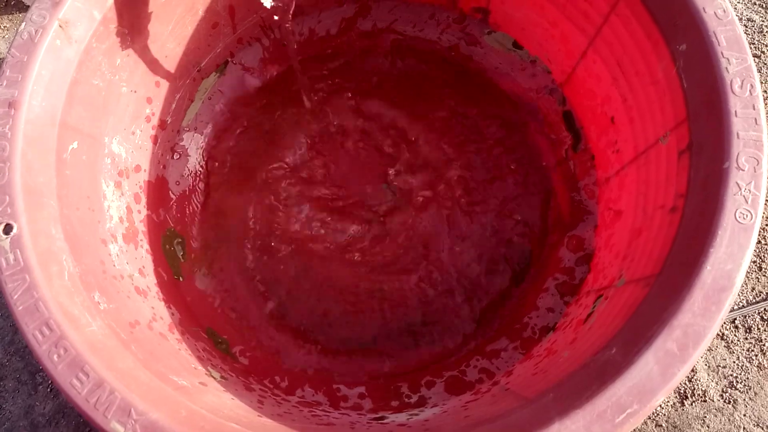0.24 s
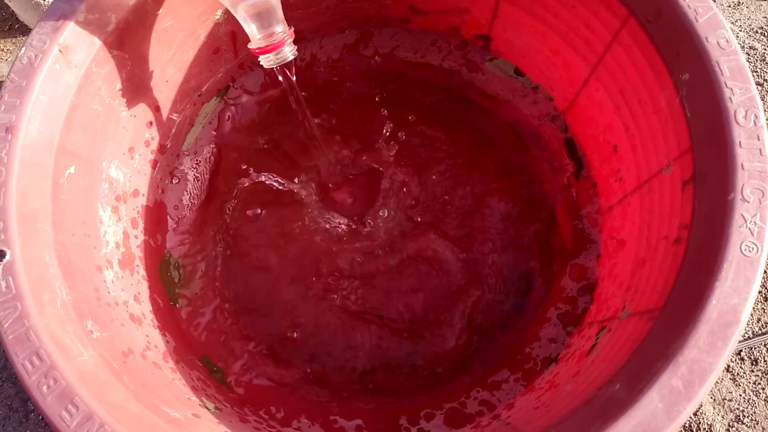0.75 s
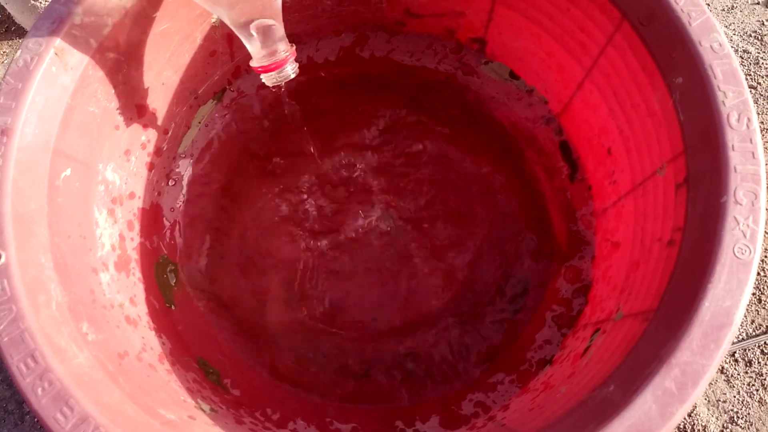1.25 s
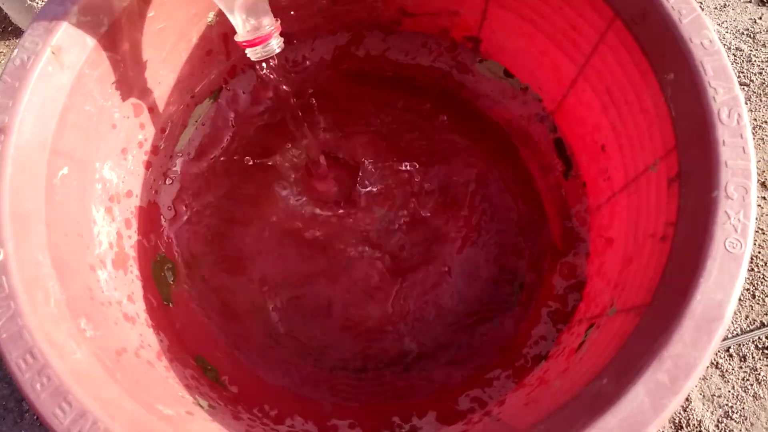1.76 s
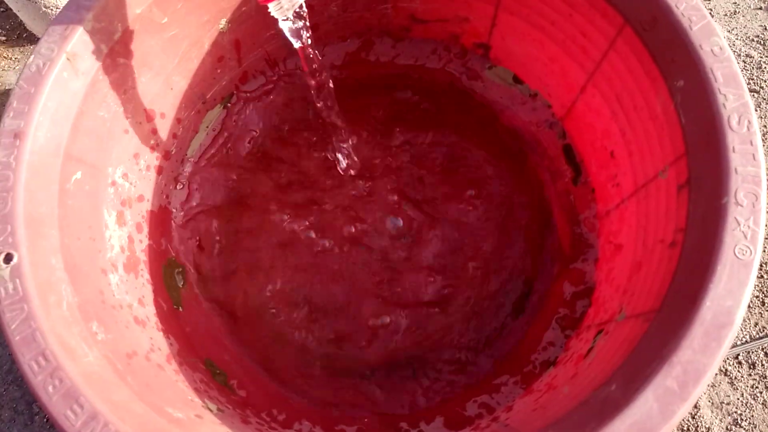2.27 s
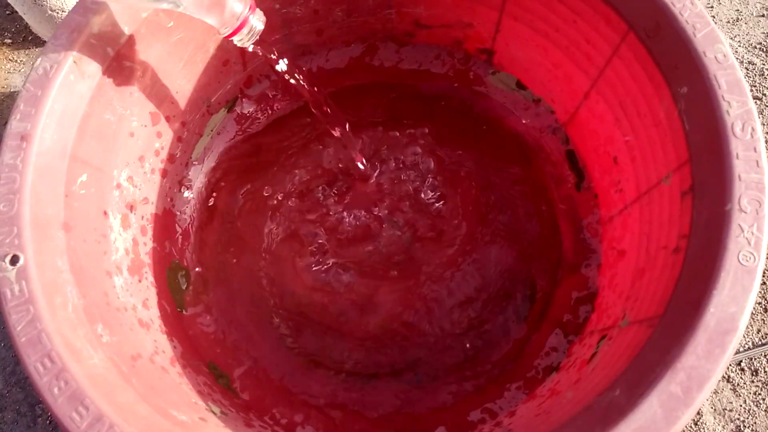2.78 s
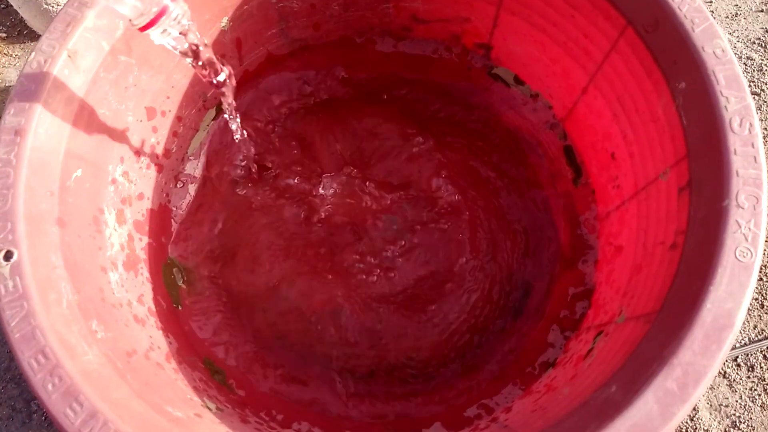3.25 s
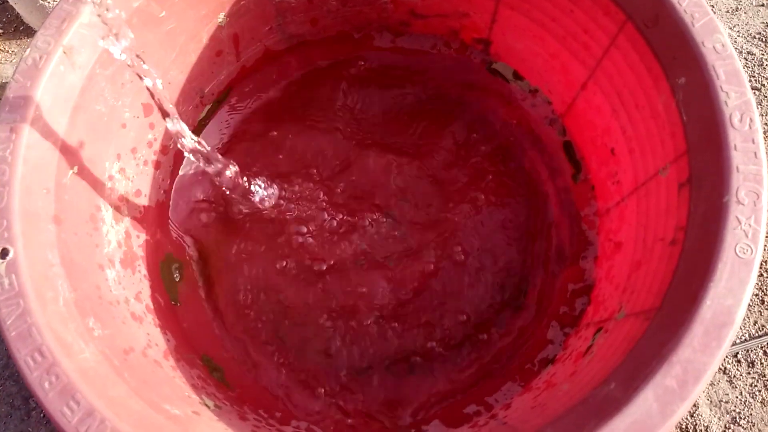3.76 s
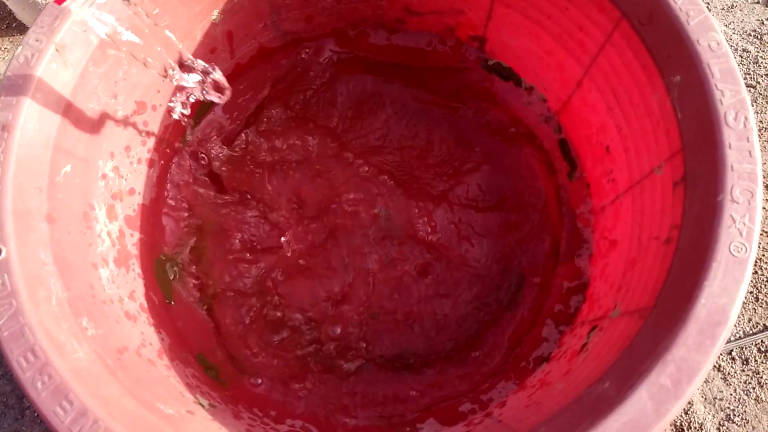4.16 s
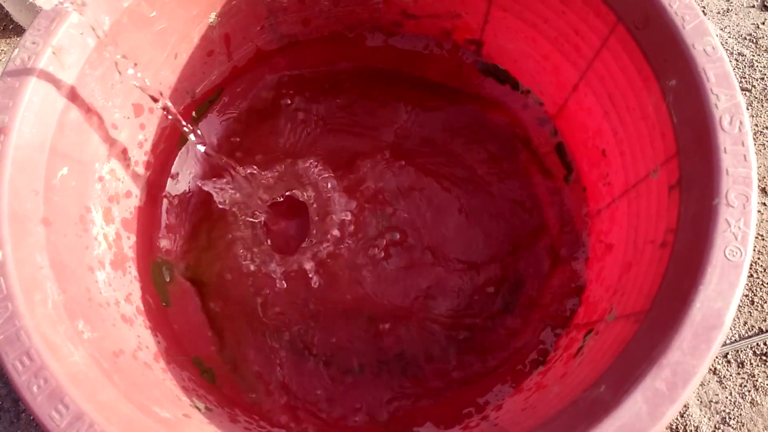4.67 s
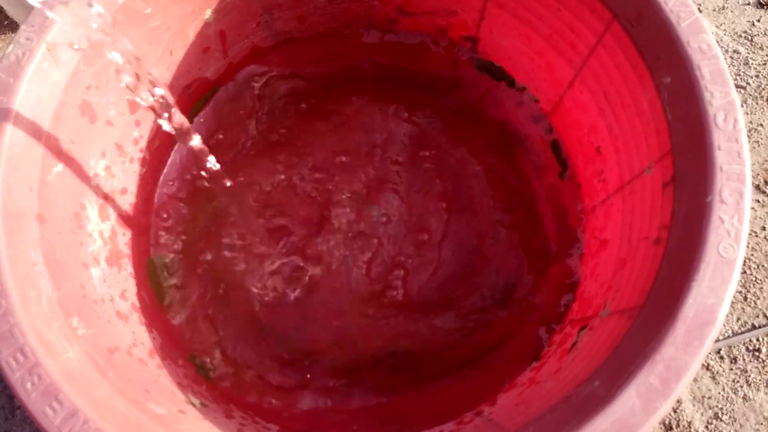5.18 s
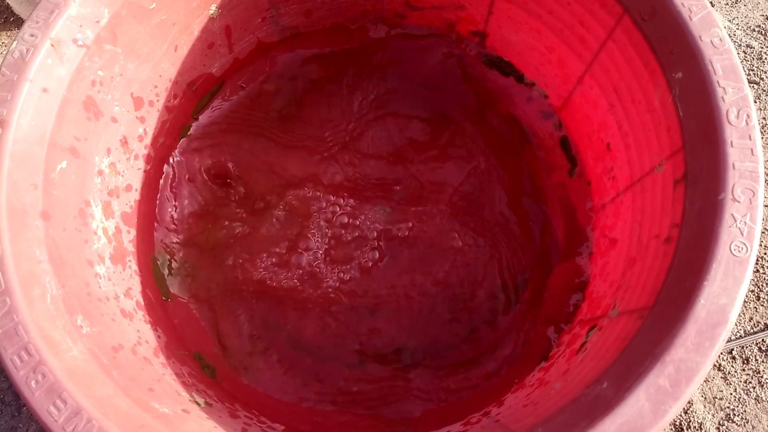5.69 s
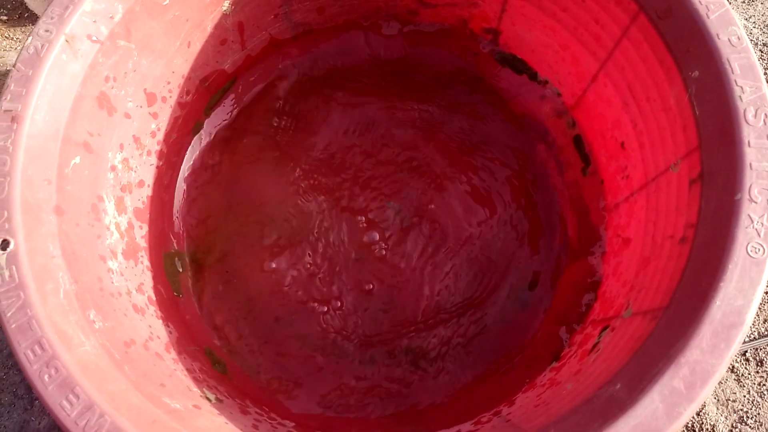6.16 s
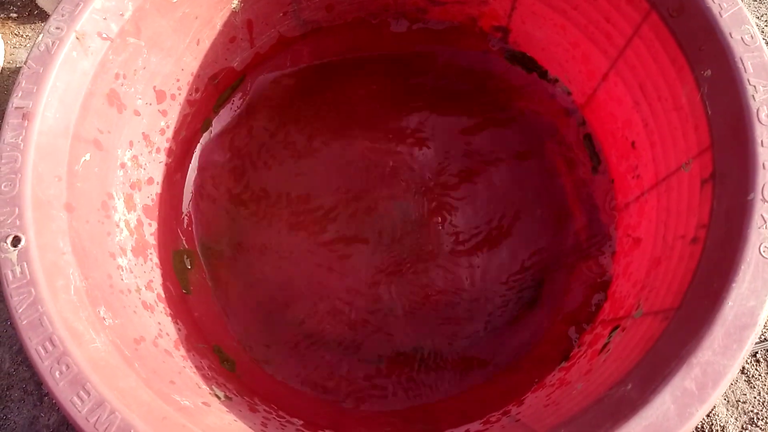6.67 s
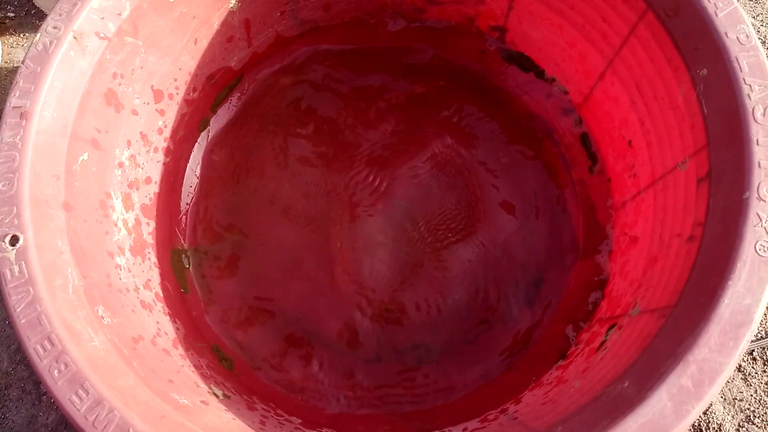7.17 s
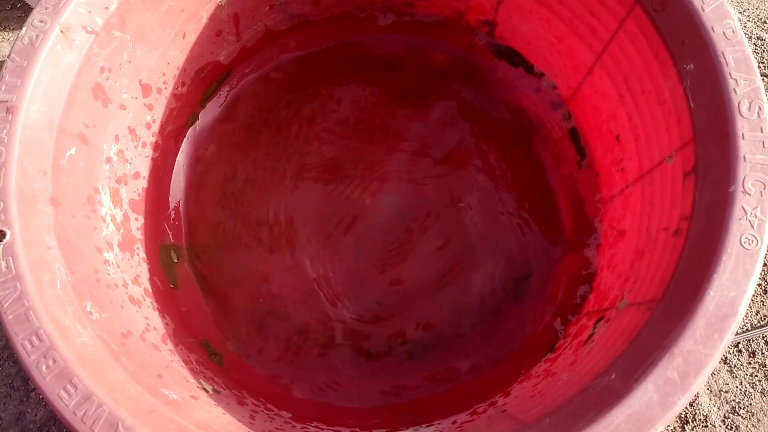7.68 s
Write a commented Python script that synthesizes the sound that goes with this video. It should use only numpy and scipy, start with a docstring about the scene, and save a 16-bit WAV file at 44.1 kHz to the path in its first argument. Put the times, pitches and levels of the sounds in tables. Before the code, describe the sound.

Water pours unevenly from a plastic bottle into a partly filled basin, splashing and gurgling, then drips as the bottle pops, over a low hum.

```python
"""Water pours from a plastic bottle into a partly filled plastic basin in a yard.
The uneven stream traps ringing bubbles and throws spray; the basin's walls echo the drops.
When the pour ends, froth crackles away and a few last drips fall. The thin bottle pops five times,
first with a double snap, last and loudest among those drips. A faint rustle and a far-off tone
pass near the end, and a low hum wavers behind it all over rumble and hiss."""
import sys
import numpy as np
from scipy import signal
from scipy.fft import rfft, irfft, next_fast_len
from scipy.io import wavfile
from scipy.ndimage import uniform_filter1d

SR = 44100
rng = np.random.default_rng(int(sys.argv[2]) if len(sys.argv) > 2 else 0)


def wav_out(sig):
    """Save sig, one row per channel (or a flat mono array), as 16-bit PCM at SR to the path in sys.argv[1]."""
    wavfile.write(sys.argv[1], SR, np.round(np.clip(np.atleast_2d(sig).T, -1, 1) * 32767).astype(np.int16))


N = 349536
TIME = np.arange(N) / SR
POUR_END_S = 5.62   # the last of the stream lands


# the unbroken stream, growing as the bottle is lifted: (time [s], gurgle [dB], splash [dB], spray [dB])
STEADY_FLOW = [(0, -62, -69, -66.5), (1.0, -61.5, -63, -67), (1.95, -62.5, -67, -69),
               (2.45, -56.5, -64.5, -63.5), (3.1, -70, -62.5, -67), (3.55, -54.5, -55, -55),
               (4.1, -81, -57.5, -54), (4.6, -84, -57.5, -56), (4.97, -66, -60, -60.5),
               (5.17, -64.5, -48, -59.5), (5.5, -59, -49, -55), (5.66, -66, -75, -71.5)]
# slugs of water plunging in: (time [s], fall time [s], splash [dB], gurgle [dB])
GUSHES = [(0.236, .06, -48, -49), (0.566, 0.028, -49, -41.5), (0.658, 0.045, -56.5, -46),
          (0.818, 0.044, -54, -47.5), (0.958, .03, -52, -44.5), (1.13, .08, -54, -49),
          (1.702, .025, -48.5, -55), (1.82, 0.05, -52, -49), (2.092, .08, -58.5, -73),
          (2.272, 0.028, -49, -46), (2.434, 0.036, -53.5, -50), (2.541, 0.037, -49.5, -64),
          (2.682, 0.056, -53, -44.5), (2.809, 0.087, -44.5, -50.5), (3.084, 0.037, -50, -53),
          (3.189, .04, -43, -46.5), (3.262, .03, -52.5, -54), (3.364, 0.046, -46, -64),
          (3.513, .04, -39.5, -45), (3.601, 0.054, -46.5, -53), (3.699, .06, -46.5, -55),
          (3.787, .04, -51, -54), (3.927, .04, -39, -51), (4.052, .025, -48, -67), (4.126, .07, -46, -53.5),
          (4.274, .06, -46.5, -60), (4.43, .06, -40, -44), (4.554, .03, -46, -89),
          (4.661, 0.028, -46.5, -51), (4.772, .028, -36.5, -40.5), (4.859, .03, -50.5, -48),
          (5.059, .07, -41, -48.5), (5.36, .05, -46, -72), (5.479, .05, -49.5, -50)]

def churning(rise_s=0.019, gush_spray_db=-7, wobble_db=2, wobble_hz=14):
    """Gurgle, splash and spray envelopes in dB: a wobbling flow plus gushes that swell and die away."""
    splash, gurgle = np.zeros((2, N))
    t = TIME[:SR // 2] - 0.1
    for s, fall_s, splash_db, gurgle_db in GUSHES:
        shape = np.exp(np.minimum(t / rise_s, -t / fall_s))
        add(splash, s + t[0], from_db(splash_db) * shape)
        add(gurgle, s + t[0], from_db(gurgle_db) * shape)
    spray = splash * from_db(gush_spray_db)
    flow = from_db(in_time(STEADY_FLOW) + wobble_db * drift(wobble_hz))
    return 20 * np.log10(np.hypot([gurgle, splash, spray], flow))


# spells in which the stream runs smooth and burbles: (start [s], length [s], level [dB])
BURBLES = [(1.11, 0.5, -52.5), (5.21, 0.37, -55.5)]

def stream(gurgle_db, splash_db, spray_db):
    """The stream plunges in with a dull push, churns up bubbles and rings the basin's lowest note."""
    large = bubble_cloud(475, 1229, per_s=170, cycles=20.3, spread_db=5, size=1600)
    medium = bubble_cloud(1153, 3690, per_s=520, cycles=29, spread_db=4, size=900, rise=0.089)
    small = bubble_cloud(3680, 11390, per_s=250, cycles=64, spread_db=7, size=800, rise=0.14)
    burble = bubble_cloud(1310, 2240, per_s=600, cycles=38, spread_db=1.5, size=1300)
    hollow = band(resonate(rng.standard_normal(N), hz=350, width=55), 260, 515)
    plunge = band(rng.standard_normal(N), 155, 203)
    water = from_db(gurgle_db - 4) * even(large, size=2600)
    water += from_db(splash_db - 4) * even(medium, size=2400)
    water += from_db(spray_db - 4.5) * even(small, size=3200)
    water += spells(BURBLES, edge_s=0.06) * burble
    water += from_db((2 * gurgle_db + splash_db) / 3 - 3) * even(hollow, size=4000)
    water += from_db(gurgle_db - 10) * even(plunge, size=4000)
    return pour_gate() * water


# tone colour of the bubble clouds and droplet patter: (frequency [Hz], gain [dB])
SPLASH_COLOUR = [(540, 0.5), (720, -3), (1100, 1), (2000, 6.5), (2600, 6.5), (3300, -10.5), (4000, 0),
                 (5000, -5), (6200, -1.5), (7200, -10), (8500, -1.5), (10000, 0), (11500, -2.5),
                 (13500, -9.5), (15500, -2.5)]

def bubble_cloud(low_hz, high_hz, per_s, cycles, spread_db, size, rise=0.27):
    """Countless bubbles at unit RMS, each climbing in pitch and dying 60 dB in about `cycles` cycles."""
    when, chance, pitch, glide = rng.random((6000, 4))[:int(per_s * N / SR)].T[..., None]
    hz = low_hz * (high_hz / low_hz) ** pitch
    age = TIME[:size] * hz / cycles   # in units of each bubble's ring time
    strength = unequal(chance, spread_db) * from_db(at_hz(SPLASH_COLOUR, hz)) * hz
    notes = strength * chirp(age, cycles, rise * glide) * impact(age, swell=0.095, t60=1)
    samples = (when * N).astype(int) + np.arange(size)
    cloud = np.bincount(samples.ravel(), notes.ravel(), N)[:N]
    return rms_one(basin_echo(cloud, wall=0.28, tail_db=-7.5, tail_t60=0.09))


def patter(low_hz, high_hz, per_s, spread_db, tick_s, bands, density=1, width_octaves=0.27):
    """Tiny droplets at unit RMS, each a noise tick around its own pitch with a short wall echo."""
    when, chance, pitch, keep = rng.random((12000, 4))[:int(per_s * N / SR)].T
    at = (when * (N - 1)).astype(int)
    strength = unequal(chance, spread_db) * (keep < (density * np.ones(N))[at])
    edges = np.geomspace(low_hz, high_hz, bands + 1)
    out = np.zeros(N)
    for low, high in zip(edges, edges[1:]):
        hz = np.sqrt(low * high)
        octaves_off = np.log2(hz / low_hz) - pitch * np.log2(high_hz / low_hz)
        hits = np.bincount(at, strength ** 2 * np.exp(-(octaves_off / width_octaves) ** 2), N) + 1e-18
        power = smear(smear(hits, tick_s / 2), tick_s)
        echo = 0.18 * smear(power, fall_s=0.004)
        noise = band(rng.standard_normal(N), low, high)
        out += from_db(at_hz(SPLASH_COLOUR, hz)) * np.sqrt(power + echo) * noise
    return rms_one(out)


def splatter(splash_db, spray_db, densest_db=-52, thinning=0.62):
    """The stream breaks into droplets: coarse ones follow the splash, fine ones and mist the spray."""
    density = from_db(thinning * (spray_db - densest_db))   # weaker flow throws fewer droplets
    coarse = patter(1334, 6200, per_s=900, spread_db=3, tick_s=0.0014, bands=8, density=density)
    fine = patter(3710, 12560, per_s=1200, spread_db=4.5, tick_s=0.0012, bands=8, density=density)
    mist = patter(14300, 16300, per_s=1100, spread_db=3, tick_s=0.0015, bands=1, density=density)
    layers = (splash_db - 5.5, coarse), (spray_db - 5, fine), (spray_db - 8, mist)
    return pour_gate() * sum(from_db(db) * even(droplets, size=3000) for db, droplets in layers)


# the largest single bubbles: (time [s], level [dB], pitch [Hz], t60 [s])
BIG_BUBBLES = [(0.037, -55, 1060, 0.017), (0.0928, -49, 1910, 0.021), (0.1351, -39, 1350, 0.012),
               (0.2122, -41.5, 1890, 0.044), (0.217, -48, 1090, 0.025), (0.2434, -41.5, 2610, 0.037),
               (0.2721, -51, 2300.0, 0.008), (0.3132, -46.5, 1380, 0.029), (0.4038, -46.5, 1100, 0.038),
               (0.5605, -43, 910, 0.035), (0.6453, -51, 1140, 0.036), (0.6648, -43, 950, 0.053),
               (0.7054, -49.5, 2680, 0.007), (0.7998, -44.5, 2170, 0.015), (0.8398, -51, 2040, 0.027),
               (0.8959, -39, 362, 0.041), (0.9464, -46, 1640, 0.044), (0.947, -49, 850, 0.035),
               (1.076, -52, 1100, 0.029), (1.256, -50.5, 990, 0.025), (1.362, -51.5, 980, 0.038),
               (1.116, -45, 1090, 0.042), (1.1477, -45, 2020, 0.008), (1.3505, -41.5, 350, 0.07),
               (1.4106, -45, 1810, 0.023), (1.4641, -47, 2070, 0.02), (1.5045, -47.5, 2050, 0.029),
               (1.7089, -41.5, 4060, 0.0039), (1.8211, -51, 1090, 0.031), (1.8686, -50.5, 1790, 0.029),
               (1.9005, -50, 2820, 0.016), (2.0241, -38, 1912, 0.033), (2.0388, -40.5, 2130, 0.015),
               (2.1151, -51, 1160, 0.04), (2.125, -50, 1970, 0.02), (2.2613, -35.5, 1290, 0.0064),
               (2.2712, -40.5, 960, 0.022), (2.272, -43.5, 2680, 0.012), (2.3238, -46, 2640, 0.011),
               (2.4256, -38.5, 1270, 0.0082), (2.4507, -47.5, 1340, 0.052), (2.6276, -37.5, 3040, 0.0075),
               (2.6414, -40.5, 1580, 0.013), (2.6793, -38, 2165, 0.027), (2.734, -41, 2020, 0.026),
               (2.7983, -42, 1920, 0.0083), (2.822, -46, 820, 0.022), (2.8355, -44, 2180, 0.011),
               (2.8699, -48, 1375, 0.044), (2.932, -51.5, 980, 0.052), (3.079, -43, 478, 0.048),
               (3.093, -42.5, 2040, 0.032), (3.181, -36, 1920, 0.0049), (3.1979, -35.5, 2100, 0.0044),
               (3.2606, -42.5, 576, 0.052), (3.3064, -45.5, 2070, 0.027), (3.3505, -41.5, 2070, 0.054),
               (3.361, -40, 2030, 0.029), (3.3698, -39, 529, 0.13), (3.3901, -34, 818, 0.059),
               (3.4861, -39.5, 1940, 0.042), (3.512, -40, 2630, 0.012), (3.5173, -39, 2310, 0.037),
               (3.5455, -46, 1720, 0.02), (3.5864, -36.5, 2230, 0.022), (3.592, -47.5, 655, 0.035),
               (3.6074, -41, 2810, 0.038), (3.6819, -41, 2110.0, 0.058), (3.7296, -47, 2590, 0.011),
               (3.7648, -49, 2520.0, 0.033), (3.797, -47.5, 500, 0.037), (3.856, -42.5, 1700, 0.023),
               (3.878, -41.5, 3840, 0.014), (3.8916, -43.5, 1470, 0.019), (3.924, -47, 2700, 0.05),
               (3.9394, -52, 2180, 0.038), (4.045, -46, 2530, 0.087), (4.0916, -46, 2670, 0.0099),
               (4.1244, -47, 1670, 0.026), (4.1412, -47, 1430, 0.02), (4.1646, -42.5, 2250, 0.021),
               (4.2345, -40.5, 1034, 0.024), (4.277, -39.5, 2780, 0.017), (4.3085, -38, 1930, 0.016),
               (4.326, -39.5, 2500, 0.016), (4.3952, -43, 2740, 0.043), (4.405, -41, 2150, 0.016),
               (4.4271, -40.5, 1400, 0.025), (4.4458, -38.5, 1180, 0.025), (4.459, -45, 400, 0.05),
               (4.4994, -43.5, 2560, 0.094), (4.6426, -41.5, 2490, 0.043), (4.6614, -38, 1950, 0.015),
               (4.7189, -30.5, 2220, 0.015), (4.7557, -35, 1320, 0.0094), (4.7562, -40, 386, 0.05),
               (4.809, -49, 674, 0.03), (4.8514, -38, 1950, 0.014), (4.863, -50, 1190, 0.025),
               (4.9303, -44, 1466, 0.036), (4.9619, -44, 1440, 0.057), (5.0367, -39, 1184, 0.043),
               (5.0613, -37.5, 2750, 0.025), (5.1118, -43, 2600, 0.046), (5.1734, -47.5, 2770, 0.05),
               (5.191, -48, 2680, 0.018), (5.2843, -44, 1390, 0.013), (5.2955, -48, 1070, 0.11),
               (5.4421, -35, 2590, 0.039), (5.4586, -40, 2660, 0.017), (5.6008, -44.5, 3840, 0.013),
               (5.711, -43, 1110, 0.0098), (6.3587, -43, 2370, 0.03), (6.362, -45.5, 430, 0.041)]

def bubbles(splash_db, rise_per_s=12, swell_s=0.0014, slap_db=-6, trim_db=-0.5):
    """A slap pinches off a bubble, whose note rises as it nears the surface; lesser ones come by chance."""
    out, t = np.zeros(N), TIME[:SR // 8]
    lesser = scatter(splash_db, level_db=-51.5, follows=0.51, spread_db=1.5,
                     low_hz=900, high_hz=2950, crowding=0.5, count=50)
    # bigger, lower bubbles ring longer
    lesser = [(s, db, hz, 0.035 * (hz / 1000) ** -0.3) for s, db, hz in lesser]
    for s, db, hz, t60 in [*BIG_BUBBLES, *lesser]:
        glide = 1 + rise_per_s * rng.random() * (t - 2 * swell_s)
        note = np.sin(2 * np.pi * np.cumsum(hz * glide) / SR)
        slap = even(band(rng.standard_normal(len(t)), hz * 0.63, hz * 1.49), size=200)
        plop = (rms_one(note) + from_db(slap_db) * slap) * impact(t, swell_s, t60)
        echoed = basin_echo(plop, wall=0.38, tail_db=-9.5, tail_t60=0.093)
        add(out, s, from_db(db + trim_db) * attack_one(echoed))
    return out


# the sharpest drops slapping the water: (time [s], level [dB], pitch [Hz], t60 [s], fizz level [dB])
SHARP_DROPS = [(0.0917, -45, 9330, 0.021, -71.0), (0.106, -59, 6000, 0.012, -70),
               (0.1357, -39.5, 6170, 0.023, -50), (0.1895, -48, 6300, 0.01, -75.0),
               (0.211, -48, 6500, 0.009, -66.0), (0.24, -48.5, 8000, 0.01, -56.0),
               (0.254, -52, 9000, 0.014, -62), (0.3653, -48.5, 4990, 0.052, -54),
               (0.431, -57, 4800, 0.011, -70), (0.651, -44, 6130, 0.015, -52),
               (0.6615, -52, 7130.0, 0.025, -57.0), (0.705, -40, 6170, 0.02, -29),
               (0.8, -50.5, 7100, 0.015, -56), (0.9463, -36, 7900, 0.018, -61),
               (1.108, -50, 5970, 0.036, -69.0), (1.1321, -47.0, 8400, 0.032, -53),
               (1.2673, -53.5, 6100, 0.0082, -64), (1.3512, -46, 9660, 0.035, -60),
               (1.451, -56, 10700, 0.015, -59), (1.564, -52, 8500, 0.04, -62),
               (1.687, -43, 6900, 0.0084, -67), (1.7071, -33.5, 10250, 0.018, -62),
               (1.803, -51.5, 7400, 0.041, -54), (1.863, -54, 9500, 0.014, -64),
               (1.9748, -38, 6300, 0.014, -44), (2.0244, -41, 3830.0, 0.023, -32),
               (2.119, -50, 9100, 0.025, -60), (2.1936, -45.5, 10700, 0.025, -64),
               (2.2556, -40, 6770, 0.043, -62.0), (2.2983, -52, 6930.0, 0.004, -65.0),
               (2.3246, -40.5, 5890, 0.012, -54), (2.365, -58, 5950, 0.012, -70),
               (2.409, -48, 5870, 0.026, -47), (2.423, -50, 9800.0, 0.025, -55),
               (2.526, -46, 6270, 0.015, -60), (2.5508, -50, 3920.0, 0.025, -61.0),
               (2.599, -49, 10400, 0.012, -60), (2.6285, -49, 3420, 0.049, -52),
               (2.642, -45, 6100, 0.023, -62.0), (2.6752, -44, 5870, 0.023, -43),
               (2.7856, -44.5, 7540, 0.044, -52.0), (2.797, -45, 5400, 0.016, -58),
               (2.843, -45.0, 9860, 0.013, -66.0), (2.871, -41.5, 3920, 0.017, -56),
               (2.9319, -48, 8440, 0.032, -65.0), (3.1638, -52, 7900, 0.029, -63.0),
               (3.1895, -42, 4830, 0.01, -64), (3.2735, -42, 9800, 0.022, -51),
               (3.278, -45.5, 3660, 0.017, -62), (3.2915, -52, 6300, 0.018, -51),
               (3.332, -49, 5760, 0.009, -65.0), (3.345, -43.0, 9830, 0.039, -56.0),
               (3.3604, -39.5, 5850, 0.013, -50.0), (3.4548, -32.5, 5150, 0.0071, -60),
               (3.4677, -38, 6800, 0.013, -48), (3.604, -36, 9600, 0.0069, -53),
               (3.6534, -46, 5760, 0.025, -65.0), (3.6978, -39.5, 4770, 0.022, -60.0),
               (3.73, -45.5, 8500, 0.01, -56), (3.8188, -43.5, 7750, 0.11, -51.0),
               (3.925, -44, 7460, 0.034, -50.0), (4.0191, -47, 10100, 0.014, -50),
               (4.044, -40.5, 4100, 0.04, -43), (4.0567, -45, 8460.0, 0.013, -58.0),
               (4.0883, -48, 5000, 0.025, -58.0), (4.113, -42, 6590.0, 0.018, -60.0),
               (4.1244, -45, 5930, 0.025, -56.0), (4.1402, -42, 6000, 0.006, -56.0),
               (4.2, -49, 9800, 0.011, -56), (4.209, -54, 10500, 0.012, -56),
               (4.308, -44, 4280, 0.016, -58), (4.402, -43, 7500, 0.075, -58),
               (4.421, -44, 4930, 0.025, -56), (4.446, -46, 5300, 0.006, -62),
               (4.4828, -45, 5900, 0.009, -38), (4.4982, -44.5, 5920, 0.049, -53.0),
               (4.5426, -42, 7600, 0.0083, -51.0), (4.5744, -45.5, 5900, 0.021, -46),
               (4.603, -49, 7000, 0.016, -65.0), (4.642, -36.5, 8370, 0.029, -52),
               (4.66, -44, 7600, 0.022, -61), (4.7006, -43, 9540.0, 0.006, -62.0),
               (4.7168, -41.5, 3300, 0.053, -37), (4.852, -48, 6350, 0.014, -66),
               (4.8693, -43, 6380, 0.011, -45), (4.895, -40, 5640, 0.0064, -60.0),
               (4.931, -46.5, 5230, 0.0087, -57.0), (4.9868, -45.5, 9600, 0.0073, -57),
               (5.033, -46, 9400, 0.04, -52), (5.049, -46, 8100, 0.014, -58),
               (5.061, -45, 9700, 0.014, -58), (5.1612, -47.5, 9950.0, 0.013, -65.0),
               (5.188, -48, 9350.0, 0.013, -59.0), (5.367, -49.5, 4900, 0.012, -62),
               (5.405, -40, 6200, 0.024, -55.0), (5.5017, -48, 6030, 0.019, -53.5),
               (5.6014, -60, 4040, 0.015, -75.0), (5.711, -46, 3300, 0.0041, -58),
               (6.1998, -63, 10050, 0.0051, -79.0), (6.3592, -48.5, 5160, 0.021, -47),
               (6.5985, -56, 9800, 0.022, -77), (6.939, -51, 9800, 0.022, -59),
               (7.013, -56.5, 6640, 0.016, -60), (7.066, -57, 9600, 0.024, -68),
               (7.331, -58, 6300, 0.018, -79), (7.3452, -55, 7040, 0.025, -69.0)]

def drops(spray_db, swell_s=0.0013, ping_db=3, rise_per_s=16, fizz_lead_s=0.002, fizz_trim_db=-5):
    """Fine spray fizzes just ahead of each drop; a crack swells as it sinks in and a tiny bubble chirps."""
    out, t = np.zeros(N), TIME[:SR // 16]
    lesser = scatter(spray_db, level_db=-60.5, follows=1, spread_db=5.5,
                     low_hz=3770, high_hz=11160, crowding=0.31, count=90)
    lesser = [(s, db, hz, 0.0086, db - 8) for s, db, hz in lesser]   # short ticks with softer fizz
    for s, db, hz, t60, fizz_db in SHARP_DROPS + lesser:
        white = rng.standard_normal(len(t))
        ping = from_db(ping_db) * chirp(t, hz, rise_per_s * rng.random()) * impact(t, swell_s, 0.84 * t60)
        crack = even(band(white, hz * 0.62, hz * 1.8), size=150) * impact(t, swell_s, t60)
        fizz = even(band(white, 14500, 16200), size=150) * impact(t, swell=0.0025, t60=t60)
        for part, part_s, part_db in (ping + crack, s, db), (fizz, s - fizz_lead_s, fizz_db + fizz_trim_db):
            echoed = basin_echo(part, wall=0.2, tail_db=-10, tail_t60=0.052, spread_s=0.0043)
            add(out, part_s, from_db(part_db) * attack_one(echoed))
    return out


def froth(start_db=-64, fade_db_per_s=26.5, floor_db=-86):
    """The foam left by the pour bursts in a fine, uneven, fading crackle."""
    since_end = TIME - POUR_END_S
    fade = from_db(start_db - fade_db_per_s * np.abs(since_end)) + from_db(floor_db)
    flicker = from_db(drift(rate_hz=3))
    crackle = patter(5500, 15500, per_s=370, spread_db=4.5, tick_s=0.00076, bands=7)
    return (since_end > 0) * fade * flicker * crackle


def basin_echo(x, wall, tail_db, tail_t60, spread_s=0.007, echoes=5):
    """A few quick wall echoes, different for each spot on the water, then a short diffuse tail."""
    t = TIME[:SR // 10]
    tail = rng.standard_normal(len(t)) * decay(t, tail_t60) * (t > 0.002)
    response = from_db(tail_db) * tail / np.linalg.norm(tail)
    path = rng.uniform(0.12, 1, echoes)
    reflections = wall * (1 - path / 2) * rng.choice([-1, 1], echoes)
    np.add.at(response, (path * spread_s * SR).astype(int), reflections)
    response[0] = 1   # the direct sound
    return signal.fftconvolve(x, response)[:len(x)]


# the basin's high notes: (frequency [Hz], width [Hz], share added [ratio])
BASIN_NOTES = [(4780, 140, 0.41), (6090, 150, 0.55), (7550, 270, 0.23), (9850, 600, 0.32)]

def basin_ring(water):
    """The basin resonates and colours all the splashing."""
    return resonant_eq(water, BASIN_NOTES)


# snaps of the bottle's wall: (time [s], ring pitch [Hz], ring [dB], thump [dB], body [dB], clack [dB],
# snap [dB], fizz [dB], yard echo send [dB])
BOTTLE_POPS = [(2.7108, 837, -30.5, -35.5, -31.5, -60, -73, -74, -24.5),
               (2.7155, 780, -36, -39.5, -29, -60, -70, -72, -30),
               (3.046, 532, -28.5, -32.5, -23.5, -23.5, -42.5, -55, -62),
               (5.5276, 822, -27, -27.5, -27.5, -27.5, -40, -50, -39),
               (6.078, 604, -24, -38, -26, -39.5, -78, -59, -26.5),
               (6.7894, 2770, -20.5, -22, -19.5, -12, -18.5, -27, -17.5)]
# a pop's five bands, thump to fizz: (low edge [Hz], high edge [Hz], bottle t60 [s], yard t60 [s])
POP_BANDS = [(115, 221, 0.099, 0.75), (464, 1360, 0.066, 0.64), (1390, 2980, 0.049, 0.48),
             (3355, 6270, 0.044, 0.45), (6530, 12400, 0.034, 0.52)]
# modes that a hard pop leaves booming: (frequency [Hz], relative level [dB], t60 [s])
BOOM_MODES = [(117.5, -5, 1), (180, -15, 0.84), (216, -2.5, 0.42), (350, -7.5, 0.38), (455, -14.5, 0.58),
              (733, -0.5, 0.34), (1090, -3.5, 0.24), (1310, -4.5, 0.35), (1706, -9.5, 0.52),
              (2400, -7, 0.3)]

def bottle_pops(buckle_s=0.0028, ring_t60=0.042, boom_db=12):
    """A dent runs across the wall for a few milliseconds; the wall rings briefly and the yard answers."""
    out, t = np.zeros(N), TIME[:SR]
    after_buckle = np.maximum(t - buckle_s, 0)
    for s, hz, ring_db, *band_db, echo_db in BOTTLE_POPS:
        ring = np.sin(2 * np.pi * hz * t) * decay(after_buckle, ring_t60)
        pop = from_db(ring_db) * attack_one(ring)
        for db, (low, high, t60, yard_t60) in zip(band_db, POP_BANDS):
            window = int(3 * SR / (high - low))
            noises = rng.standard_normal((2, SR + SR // 10))
            near, far = [even(band(white, low, high, order=3), window)[-SR:] for white in noises]
            attack = 1 - np.exp(-t * high)
            yard = from_db(echo_db) * far * decay(t, yard_t60)
            pop += from_db(db) * attack * (near * decay(after_buckle, t60) + yard)
        drive_db = band_db[0] + echo_db + boom_db   # the thump sets the modes booming
        for mode_hz, db, t60 in BOOM_MODES:
            pop += from_db(drive_db + db) * np.sin(2 * np.pi * mode_hz * t) * decay(t, t60)
        add(out, s, pop)
    return out


def rustle(start_s=6.37, length_s=0.29, level_db=-69):
    """A faint soft rustle follows one of the last drips."""
    fade = np.interp(TIME - start_s, [-0.01, 0, length_s / 2, length_s], [0, 1, 0.7, 0])
    return from_db(level_db) * fade * rms_one(band(rng.standard_normal(N), 3800, 5500, order=4))


# contour of a faint far-off tone: (time [s], pitch [Hz], level [dB])
FAR_TONE = [(6.2, 995, -83), (6.26, 980, -55), (6.33, 950, -77), (6.385, 975, -49.5), (6.43, 1005, -77),
            (6.52, 890, -82), (6.57, 905, -54), (6.65, 945, -80)]

def far_tone():
    """A thin tone wavers briefly, far away."""
    hz, db = in_time(FAR_TONE)
    sounding = (TIME > FAR_TONE[0][0]) & (TIME < FAR_TONE[-1][0])
    return sounding * from_db(db) * np.sin(2 * np.pi * np.cumsum(hz) / SR)


# the bed sinks during the pour and returns after it: (time [s], hum [dB], rumble [dB], far hiss [dB])
BED_LEVELS = [(0, -54.5, -46, -65), (1.0, -51.5, -49, -60.5), (2.7, -66.5, -56.5, -61.5),
              (4.0, -64, -58.5, -75), (5.66, -60.5, -63.5, -66.5), (5.73, -52, -49, -55.5),
              (6.5, -49.5, -46.5, -56.5), (7.93, -47.5, -49, -56.5)]
# partials of the hum: (frequency [Hz], relative level [dB], width [Hz])
HUM_TONES = [(183, 0, 1.5), (186, -6, 18), (364, -22, 8)]
# swells of the hum: (start [s], length [s], level [dB])
HUM_SWELLS = [(0.07, 0.3, -46), (0.47, 0.44, -43.5), (1.06, 0.31, -42.5), (1.54, .27, -43.5),
              (1.97, 0.26, -41.5), (2.4, 0.21, -44.5), (2.74, 0.243, -48.5), (3.39, 0.34, -53.5),
              (4.16, 0.13, -54.5)]
# tone colour of the rumble: (frequency [Hz], gain [dB])
RUMBLE_COLOUR = [(20, -44), (40, -17), (55, -2), (70, -4), (90, 0.5), (120, -4), (150, 0.5), (220, -2),
                 (290, -13), (420, -13), (700, -71)]
# deep throbs as the pour begins: (time [s], level [dB])
THROBS = [(0.24, -47), (0.44, -45), (0.64, -45.5), (0.87, -46)]
# tone colour of the far hiss: (frequency [Hz], gain [dB])
HISS_COLOUR = [(200, -15.5), (350, 2.5), (480, 4), (700, -2.5), (1000, -5), (1350, -5), (1750, -1),
               (2600, -4), (3100, -14), (4200, -22.5), (6000, -32.5), (8000, -44), (10000, -27),
               (12500, -57), (16000, -42)]

def yard_bed(rumble_trim_db=-1, throb_hz=69, throb_s=0.057):
    """A wavering hum over low rumble and far hiss, with a few deep throbs."""
    hum_db, rumble_db, hiss_db = in_time(BED_LEVELS)
    tones = np.zeros(N)
    for hz, db, width in HUM_TONES:
        phase = 2 * np.pi * hz * TIME
        tones += from_db(db) * even(drift(width) * np.cos(phase) + drift(width) * np.sin(phase), size=2000)
    hum = np.hypot(from_db(hum_db), spells(HUM_SWELLS, edge_s=0.0023)) * even(tones, size=2400)
    rumble = from_db(rumble_db + rumble_trim_db) * even(coloured_noise(RUMBLE_COLOUR), size=6000)
    pulses = sum(from_db(db) * np.exp(-((TIME - s) / throb_s) ** 2) for s, db in THROBS)
    throbs = pulses * np.sin(2 * np.pi * throb_hz * TIME)
    hiss = from_db(hiss_db) * coloured_noise(HISS_COLOUR)
    return hum + rumble + throbs + hiss


def scatter(churn_db, level_db, follows, spread_db, low_hz, high_hz, crowding, count):
    """Chance hits (time [s], level [dB], pitch [Hz]), denser and louder where the pour churns harder."""
    when, size, pitch = rng.random((count, 3)).T
    pouring = TIME < POUR_END_S
    swing_db = churn_db - churn_db[pouring].mean()
    due = np.cumsum(from_db(crowding * swing_db) * pouring)
    s = np.interp((np.arange(count) + when) / count, due / due[-1], TIME)
    db = level_db + follows * np.interp(s, TIME, swing_db) + spread_db * (2 * size - 1)
    return np.transpose([s, db, low_hz * (high_hz / low_hz) ** pitch])


def pour_gate():
    """Open while the stream lands, then a quick fade to silence."""
    return np.interp(TIME - POUR_END_S, [0, 0.07], [1, 0])


def spells(rows, edge_s):
    """Gain of sounds that fade in, hold and fade out."""
    return sum(from_db(db) * (np.tanh((TIME - s) / edge_s) - np.tanh((TIME - s - length) / edge_s)) / 2
               for s, length, db in rows)


def chirp(t, pitch, rise):
    """The note of a bubble, climbing as it nears the surface."""
    return np.sin(2 * np.pi * pitch * (t + rise * t ** 2 / 2))


def impact(t, swell, t60):
    """Envelope of a hit: a quick swell, then decay."""
    return (1 - np.exp(-(t / swell) ** 2)) * decay(t, t60)


def decay(t, t60):
    return np.exp(-np.log(1000) * t / t60)


def unequal(chance, spread_db):
    """Strengths of grains: most are weak, a few stand out."""
    return from_db(spread_db * np.minimum(-np.log(1 - chance), 4))


def drift(rate_hz):
    """Slow random wander at unit RMS."""
    step, run_in = 40, 2000
    pole = np.exp(-2 * np.pi * rate_hz * step / SR)
    white = rng.standard_normal(N // step + run_in + 2)
    slow = signal.lfilter([1], [1, -2 * pole, pole * pole], white)[run_in:]
    return np.interp(np.arange(N) / step, np.arange(len(slow)), rms_one(slow))


def coloured_noise(colour):
    """Steady noise with a smooth spectrum, at unit RMS."""
    size = next_fast_len(N, True)
    hz = np.maximum(np.fft.rfftfreq(size, 1 / SR), 1)
    spectrum = rfft(rng.standard_normal(size)) * from_db(at_hz(colour, hz))
    return rms_one(irfft(spectrum, size)[:N])


def band(x, low, high, order=2):
    sos = signal.butter(order, [low, min(high, 0.47 * SR)], "band", fs=SR, output="sos")
    return signal.sosfilt(sos, x)


def resonate(x, hz, width):
    """One resonance of gain 1."""
    r = np.exp(-np.pi * width / SR)
    feedback = [1, -2 * r * np.cos(2 * np.pi * hz / SR), r * r]
    return signal.lfilter(np.array([1, 0, -1]) * (1 - r * r) / 2, feedback, x + 1e-18)


def resonant_eq(x, notes):
    """Positive shares add peaks, negative ones carve dips."""
    return x + sum(share * resonate(x, hz, width) for hz, width, share in notes)


def smear(x, fall_s):
    """Gives every spike an exponential tail."""
    return signal.lfilter([1 / (fall_s * SR)], [1, -np.exp(-1 / (fall_s * SR))], x)


def even(x, size):
    """Rides the gain to hold unit RMS over every `size` samples."""
    return x / np.sqrt(np.abs(uniform_filter1d(x ** 2, size)) + 1e-4 * np.mean(x ** 2))


def attack_one(x):
    """Unit RMS over the first 10 ms."""
    return x / np.sqrt(np.mean(x[:SR // 100] ** 2) + 1e-20)


def rms_one(x):
    return x / np.sqrt(np.mean(x ** 2) + 1e-20)


def from_db(db):
    return 10 ** (np.asarray(db) / 20)


def in_time(rows):
    """Each column of an automation curve at every sample."""
    s, *columns = np.transpose(rows)
    return [np.interp(TIME, s, column) for column in columns]


def at_hz(colour, hz):
    """Gain in dB of a tone colour at these frequencies."""
    points_hz, points_db = np.transpose(colour)
    return np.interp(np.log(hz), np.log(points_hz), points_db)


def add(out, s, sound):
    at = max(round(s * SR), 0)
    out[at:at + len(sound)] += sound[:max(N - at, 0)]


def scene():
    """Mono mix: the water in its ringing basin, the popping bottle and the yard behind."""
    gurgle_db, splash_db, spray_db = churning()
    water = stream(gurgle_db, splash_db, spray_db) + splatter(splash_db, spray_db)
    water = water + bubbles(splash_db) + drops(spray_db) + froth()
    return (basin_ring(water) + bottle_pops() + rustle() + far_tone() + yard_bed())[None]


# the microphone's treble dip and peak: (frequency [Hz], width [Hz], share added [ratio])
MIC_COLOUR = [(13080, 2770, -0.8), (15400, 900, 0.3)]

def record(dry, ceiling=0.85, low_cut_hz=42, high_cut_hz=16200):
    """The microphone colours the treble; deep bass is shed, peaks are rounded and the top is cut."""
    low_cut = signal.butter(3, low_cut_hz, "high", fs=SR, output="sos")
    high_cut = signal.ellip(10, 0.2, 70, high_cut_hz, fs=SR, output="sos")
    coloured = signal.sosfilt(low_cut, resonant_eq(dry, MIC_COLOUR))
    rounded = ceiling * np.tanh(coloured / ceiling)
    return signal.sosfilt(high_cut, rounded)


dry = scene()
out = record(dry)
wav_out(out)
```